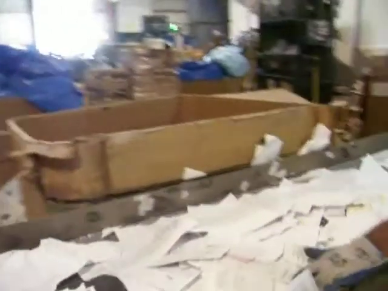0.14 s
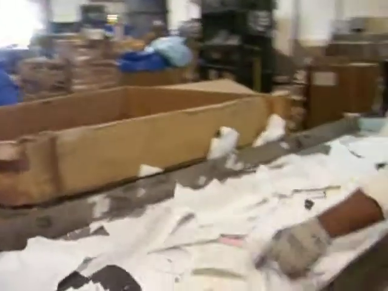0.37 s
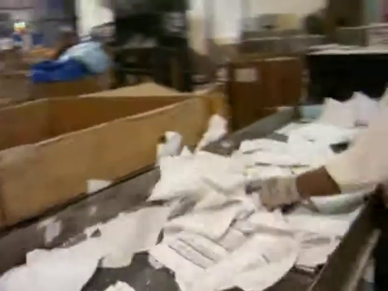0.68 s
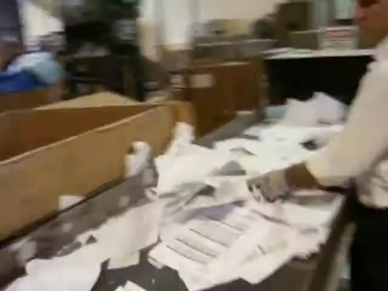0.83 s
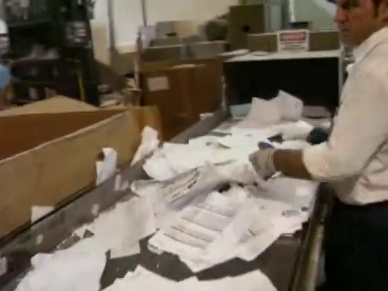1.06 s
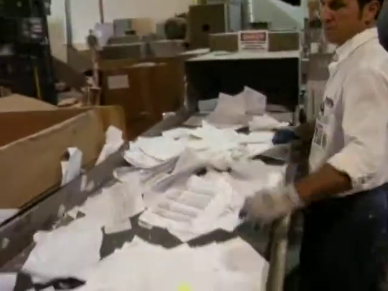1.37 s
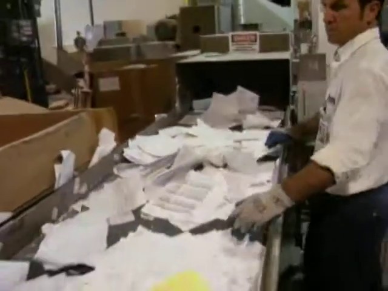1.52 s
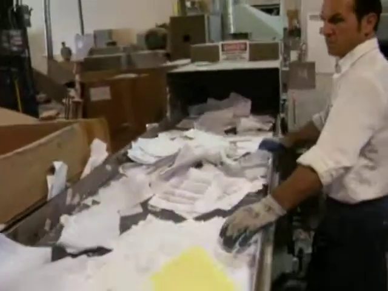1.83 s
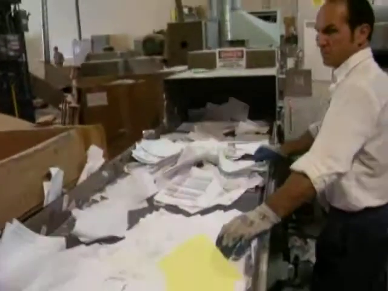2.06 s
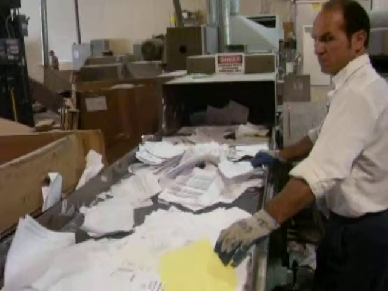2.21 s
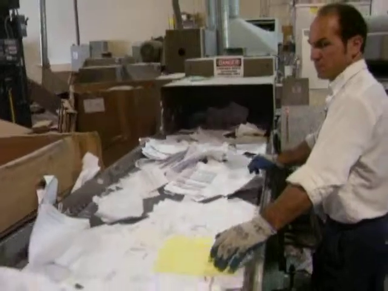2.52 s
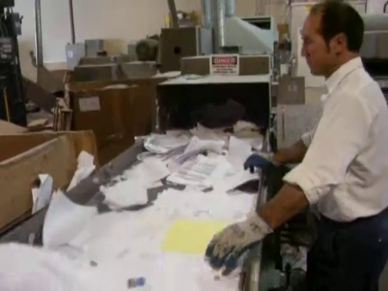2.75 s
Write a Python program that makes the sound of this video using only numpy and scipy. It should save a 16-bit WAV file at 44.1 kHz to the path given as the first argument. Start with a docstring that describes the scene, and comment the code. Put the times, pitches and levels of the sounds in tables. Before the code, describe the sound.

A paper shredder and its conveyor drone loudly, with three crackling surges of tearing sheets.

```python
"""A steady machine roar and hum fill a warehouse, where a paper conveyor feeds a shredder.
Shafts drone, the housing rings and the drive whines; loose sheets rustle, the belt knocks its frame
and thick wads boom in the chute. About once a second the cutters bite into a batch of sheets,
which tear in a dense crackle and snap. Peaks overload a small camera microphone beside the belt,
and after each surge the level drops abruptly and creeps back."""
import sys
import numpy as np
from scipy import signal
from scipy.fft import rfft, irfft
from scipy.io import wavfile
from scipy.ndimage import uniform_filter1d

SR = 44100
rng = np.random.default_rng(int(sys.argv[2]) if len(sys.argv) > 2 else 0)


def inscribe(sig):
    """Save sig as 16-bit PCM at rate SR to the path in sys.argv[1].

    A 1-D sig is mono; a 2-D sig holds one channel per row.
    Samples are clipped to [-1, 1] before scaling.
    """
    pcm = np.round(np.clip(np.atleast_2d(sig).T, -1, 1) * 32767)
    wavfile.write(sys.argv[1], SR, pcm.astype(np.int16))


N = 126126
T = np.arange(N) / SR
FREQS = np.fft.rfftfreq(N, 1 / SR) + 1  # Hz, offset by 1 to stay above zero


def undb(db):
    """Decibels to gain."""
    return 10 ** (np.asarray(db) / 20)


def unit(x):
    """Scale to rms 1."""
    return x / np.sqrt(np.mean(x ** 2) + 1e-18)


def wander(per_s):
    """Smooth random modulation, rms 1, changing about per_s times a second."""
    hold = int(SR / per_s)
    steps = np.repeat(rng.standard_normal(N // hold + 4), hold)
    return unit(uniform_filter1d(uniform_filter1d(steps, hold), hold)[hold:hold + N])


def equalise(x, curve):
    """Shape a sound by an EQ curve, rolling off steeply above its last point; rms 1."""
    hz, db = np.array(curve).T
    gain = undb(np.interp(np.log(FREQS), np.log(hz), db))
    return unit(irfft(rfft(x) * gain / np.hypot(1, (FREQS / hz[-1]) ** 8), N))


def resonant_noise(hz, width_hz):
    """Noise through a resonance with steep skirts, rms 1."""
    detuning = (FREQS ** 2 - hz ** 2) / (FREQS * width_hz * 1.19)
    return unit(irfft(rfft(rng.standard_normal(N)) / (1 + 1j * detuning) ** 2, N))


def clicks(per_s, spread_db):
    """Random clicks of uneven size."""
    impulses = (rng.random(N) < per_s / SR) * np.sign(rng.standard_normal(N))
    return impulses * undb(spread_db * np.clip(rng.standard_normal(N), -2, 2))


def swell(at, half_s):
    """Bell-shaped envelope peaking at 1."""
    return np.exp(-((T - at) / half_s) ** 2)


def warehouse(x, t60_s=0.98, wet_db=-2.5):
    """The direct sound and, 10 ms later, the diffuse tail of the hall."""
    tail = rng.standard_normal(N) * undb(-60 * T / t60_s) * (T > .01)
    return x + undb(wet_db) * signal.fftconvolve(x, tail / np.sqrt(np.sum(tail ** 2)))[:N]


# EQ of the machine's roar in the hall (frequency [Hz], gain [dB])
ROAR_EQ = [(25, -48), (55, -25), (100, -11), (200, -5.5), (300, -3), (390, -5.5), (480, 0), (600, 1.5),
           (700, -3.5), (950, -3), (1150, -11.5), (1500, -11), (2100, -10), (3100, -11.5), (3700, -19),
           (4500, -37)]


def roar(level_db=-15.5, swell_db=0.73, flicker_db=1.0):
    """Broad rumble of belt and rotor; each octave flickers by itself."""
    spectrum, bed = rfft(rng.standard_normal(N)), 0
    octave = np.clip(np.round(np.log2(FREQS / 100)), 0, 5)
    for k in range(6):
        bed += irfft(spectrum * (octave == k), N) * undb(flicker_db * wander(22.04))
    return undb(level_db + swell_db * wander(5.04)) * equalise(bed, ROAR_EQ)


# hum of motors and shafts (frequency [Hz], level [dB])
HUM_TONES = [(109, -39), (264, -27.5), (360, -36), (528, -27.5), (809, -34.5)]
# resonances of the housing (frequency [Hz], width [Hz], level [dB])
HOUSING_MODES = [(269.2, 28.3, -26), (302.8, 19, -31), (471.3, 13, -32.5), (527, 30, -32), (782, 33, -31.5),
                 (1192, 27, -37.5)]
# fader ride on hum and housing together (time [s], gain [dB])
DRONE_FADER = [(0, 5), (.3, 4.5), (.62, 1.5), (.85, -8), (1.2, -1.5), (1.65, -0.5), (1.95, 0.5), (2.2, 0.5),
               (2.38, 2), (2.55, -7.5), (2.86, -2.5)]


def drone(pitch_drift=0.00438, flutter_db=2.5):
    """Wavering shaft tones and the ringing housing."""
    out = 0
    for hz, db in HUM_TONES:
        phase = 2 * np.pi * np.cumsum(hz * (1 + pitch_drift * wander(12))) / SR
        out += undb(db) * unit(np.sin(phase) * undb(flutter_db * wander(24)))
    for hz, width, db in HOUSING_MODES:
        out += undb(db) * resonant_noise(hz, width)
    return out * undb(np.interp(T, *np.array(DRONE_FADER).T))


# partials of the drive (harmonic [number], level [dB])
WHINE_PARTIALS = [(5, -45.5), (7, -38), (9, -36), (11, -38.5)]


def drive_whine(base_hz=294.65, pitch_drift=.0006, flutter_db=1.9):
    """Thin odd harmonics of the drive, each fluttering by itself."""
    phase = 2 * np.pi * np.cumsum(base_hz * (1 + pitch_drift * wander(5.5))) / SR
    return sum(undb(db) * unit(np.sin(k * phase) * undb(flutter_db * wander(7)))
               for k, db in WHINE_PARTIALS)


# handfuls of sheets shuffled on the belt (time [s], half length [s], level [dB])
HANDFULS = [(0.977, 0.03, -26), (2.08, 0.054, -33), (2.812, 0.062, -30)]
# EQ of crinkling paper (frequency [Hz], gain [dB])
PAPER_EQ = [(30, -55), (150, -28.5), (400, -10), (800, -0.5), (1000, 0), (1300, -1), (3000, -8.5),
            (4200, -13.5)]


def paper_rustle(steady_db=-29, flicker_db=2):
    """Loose sheets crinkle all the time, and more when a handful is moved."""
    envelope = undb(steady_db) + sum(undb(db) * swell(at, half) for at, half, db in HANDFULS)
    crinkle = equalise(clicks(per_s=800, spread_db=5), PAPER_EQ)
    return envelope * crinkle * undb(flicker_db * wander(30))


# modes of the conveyor frame (frequency [Hz], relative level [dB], decay by 60 dB [s])
FRAME_MODES = [(534, -9, 0.017), (777, 1, .05), (940, 4, 0.024), (1140, -1.5, 0.018), (1770, -10, 0.06)]


def frame_ring(detune=0.043):
    """One strike on the frame: fast-dying modes, slightly retuned at random."""
    ring = 0
    for hz, db, t60 in FRAME_MODES:
        pitch = hz * (1 + detune * rng.standard_normal())
        ring += undb(db) * np.sin(2 * np.pi * pitch * T) * undb(-60 * T / t60)
    return ring / 2


# knocks of the belt on its frame (time [s], gain [dB])
BELT_KNOCKS = [(.015, -11), (.368, -9), (.456, -13), (.826, -11), (.918, -2), (.927, -10), (.975, -11),
               (1.002, -4.5), (1.022, -11), (2.26, -9.5)]


def belt_clatter(rattle_db=-29.5, low_cut_hz=250):
    """Knocks and lighter random rattles ring the frame, which radiates little bass."""
    rattle = signal.fftconvolve(clicks(per_s=18, spread_db=2.5), frame_ring())[:N]
    out = undb(rattle_db) * unit(rattle)
    for at, db in BELT_KNOCKS:
        out += undb(db) * np.interp(T - at, T, frame_ring(), left=0)
    return signal.sosfilt(signal.butter(2, low_cut_hz, "high", fs=SR, output="sos"), out)


# booms of the chute (time [s], half length [s], frequency [Hz], width [Hz], level [dB])
CHUTE_BOOMS = [(1.485, .05, 613, 230, -18), (1.333, 0.1, 209, 79, -24), (1.6, 0.046, 600, 86, -23),
               (2.26, .05, 430, 60, -23)]


def chute():
    """The sheet-metal chute gives a short hollow swell as a thick wad passes."""
    return sum(undb(db) * swell(at, half) * resonant_noise(hz, width)
               for at, half, hz, width, db in CHUTE_BOOMS)


def cutting_effort(start, end, lead_s, fade_db_per_s, lead_db=-4, release_s=0.039):
    """Envelope of one batch: the sheets are drawn in, bitten hard, torn ever more easily, then gone."""
    draw_in = undb(lead_db) * np.exp(np.minimum(T - start, 0) / lead_s)
    tear = undb(-fade_db_per_s * np.maximum(T - start, 0))
    release = np.exp(-np.maximum(T - end, 0) / release_s)
    return np.where(T < start, draw_in, tear) * release


# batches in the cutters (start [s], end [s], level [dB], lead-in [s], fade [dB/s])
PAPER_BATCHES = [(0.498, 0.63, -11, 0.13, 50), (1.347, 1.514, -14.5, 0.065, 16.5),
                 (2.418, 2.503, -12, 0.015, 84)]
# stiff sheets snapping (time [s], level [dB])
SHEET_SNAPS = [(0.015, -19.5), (0.366, -16.5), (0.456, -18.5), (0.5, -7), (0.53, -17), (.619, -13.5),
               (1.364, -18), (1.418, -9.5), (1.531, -14.5), (2.26, -16.5), (2.411, -11.5), (2.424, -9),
               (2.453, -14.5)]
# EQ of tearing fibres (frequency [Hz], gain [dB])
TEAR_EQ = [(25, -4.5), (70, -2.5), (200, -7.5), (400, -6), (600, -6.5), (1000, 3.5), (1500, -3),
           (3000, -4.5), (3700, -6.5), (4500, -10)]


def shredding(spray_s=0.0064, crack_hz=2830, crack_s=.0008, crack_boost_db=11, flicker_db=1.6):
    """Tearing fibres crackle densely; stiff sheets snap with a hard crack and a spray of crackle."""
    tearing = sum(undb(db) * cutting_effort(start, end, lead, fade)
                  for start, end, db, lead, fade in PAPER_BATCHES)
    spray, cracks = 0, 0
    for at, db in SHEET_SNAPS:
        age = np.maximum(T - at, 0)
        spray += undb(db) * (T >= at) * np.exp(-age / spray_s)
        pitch = crack_hz * (1 + 0.19 * rng.standard_normal())
        cracks += undb(db + crack_boost_db) * np.sin(2 * np.pi * pitch * age) * np.exp(-age / crack_s)
    crackle = equalise(clicks(per_s=4900, spread_db=4.5), TEAR_EQ)
    return cracks + np.hypot(tearing, spray) * crackle * undb(flicker_db * wander(70))


def scene(load_db=2):
    """Mono mix: the roar swells while the cutters work; rustle and clatter get the hall's reverb."""
    load = sum(cutting_effort(start, end, lead, fade) for start, end, _, lead, fade in PAPER_BATCHES)
    machine = roar() * undb(load_db * load) + drone() + drive_whine()
    return (machine + shredding() + chute() + warehouse(paper_rustle() + belt_clatter()))[None]


# sudden dips of the whole mix (time [s], depth [dB], hold [s], recovery [s])
LEVEL_DIPS = [(0.647, 3, 0.13, 0.045), (0.75, 2, .025, 0.022), (1.542, 4.5, 0.058, 0.32),
              (1.703, 6.5, .012, 0.0089), (2.485, 3.5, 0.18, 0.13), (2.6, 7, 0.018, 0.011)]


def record(dry, attack_s=0.0035, overload=0.64, band_hz=4075, ceiling=0.6757, top_hz=15900):
    """The level dips at set times; peaks clip, the treble is cut, overshoots clip again as faint ticks."""
    dip_db = sum(np.interp(T, np.cumsum([at, attack_s, hold, recovery]), [0, depth, depth, 0])
                 for at, depth, hold, recovery in LEVEL_DIPS)
    clipped = np.clip(dry * undb(-dip_db), -overload, overload)
    narrow = irfft(rfft(clipped) / (1 + (np.fft.rfftfreq(N, 1 / SR) / band_hz) ** 24), N)
    top_cut = signal.ellip(8, .2, 70, top_hz, fs=SR, output="sos")
    return signal.sosfilt(top_cut, np.clip(narrow, -ceiling, ceiling))


dry = scene()
out = record(dry)
inscribe(out)
```